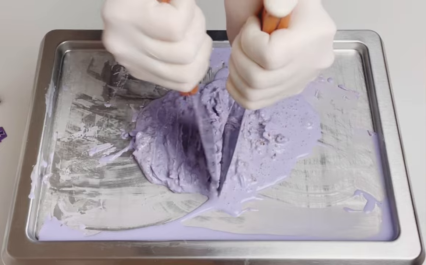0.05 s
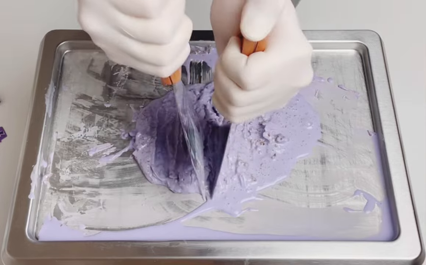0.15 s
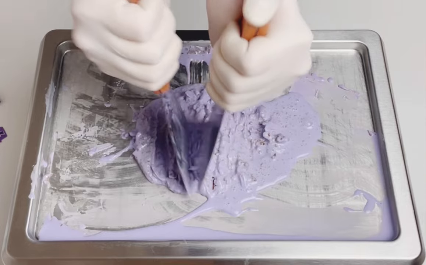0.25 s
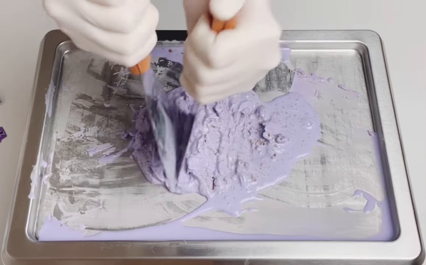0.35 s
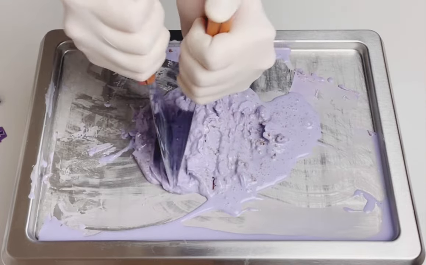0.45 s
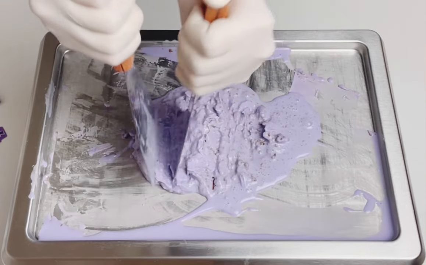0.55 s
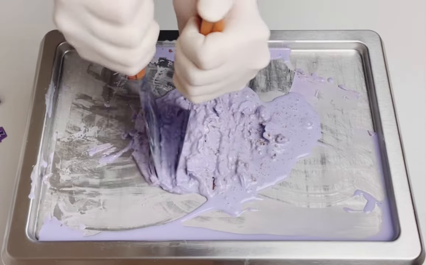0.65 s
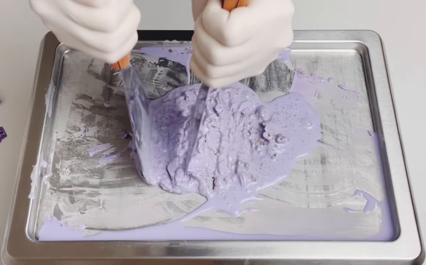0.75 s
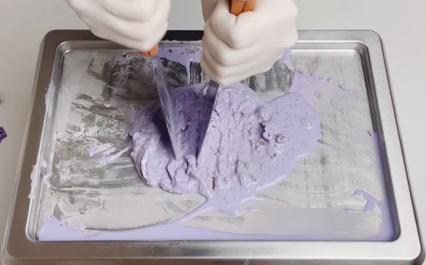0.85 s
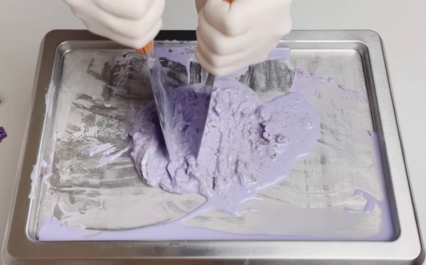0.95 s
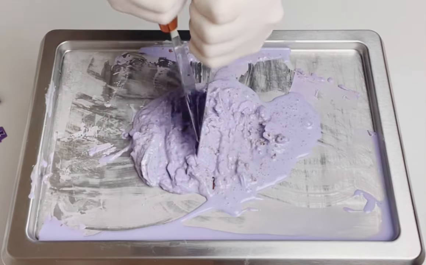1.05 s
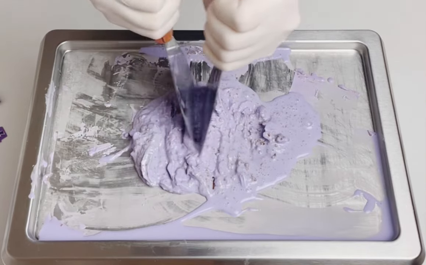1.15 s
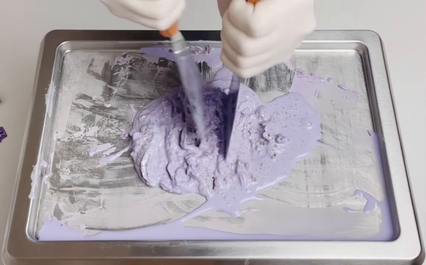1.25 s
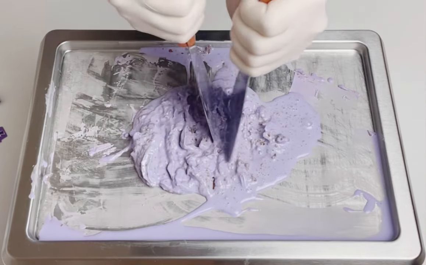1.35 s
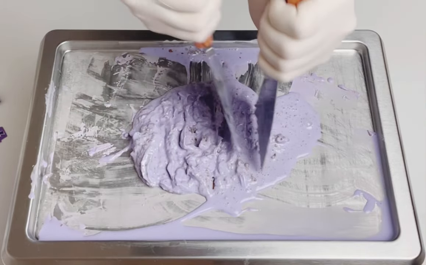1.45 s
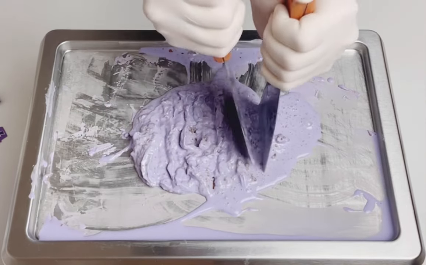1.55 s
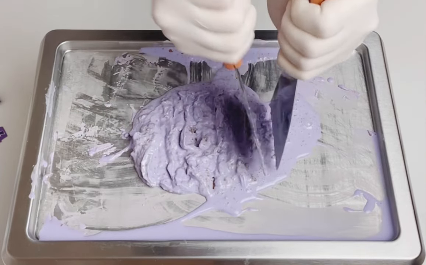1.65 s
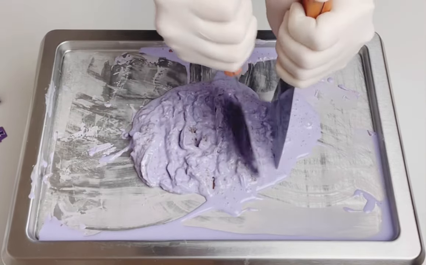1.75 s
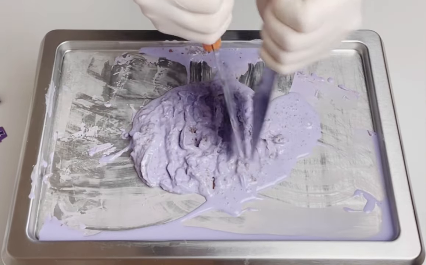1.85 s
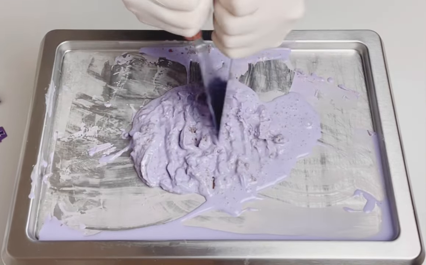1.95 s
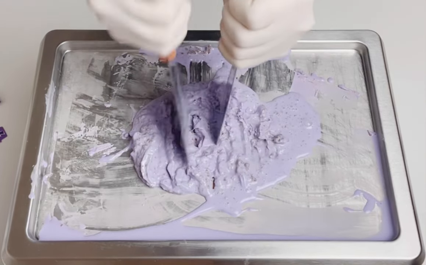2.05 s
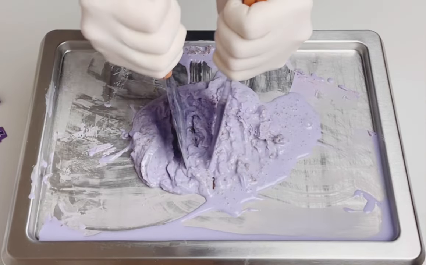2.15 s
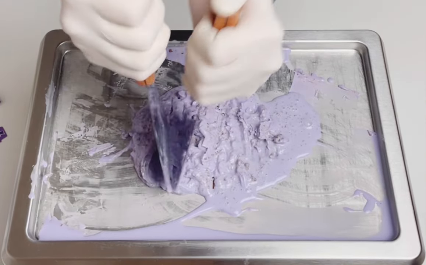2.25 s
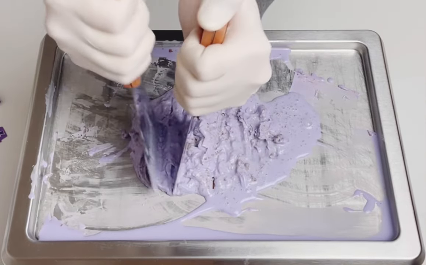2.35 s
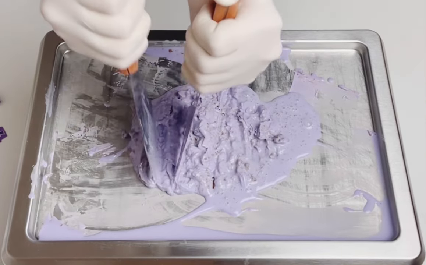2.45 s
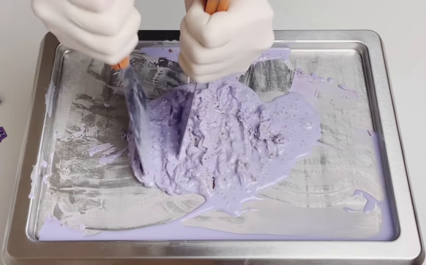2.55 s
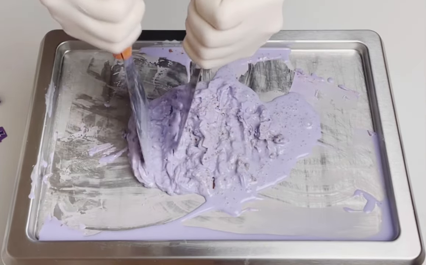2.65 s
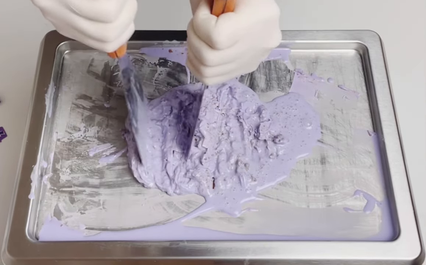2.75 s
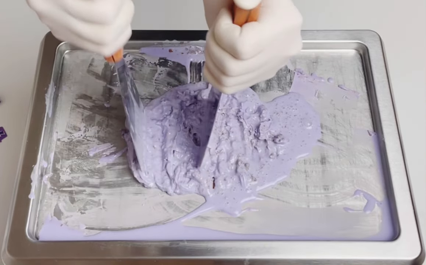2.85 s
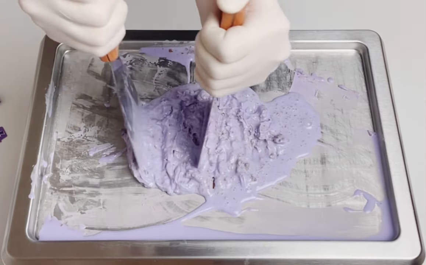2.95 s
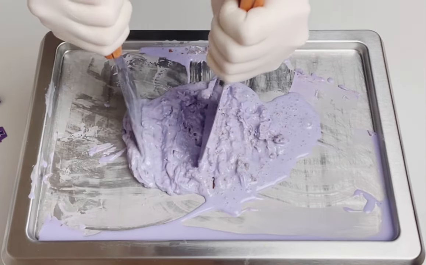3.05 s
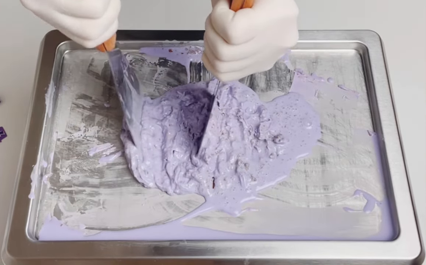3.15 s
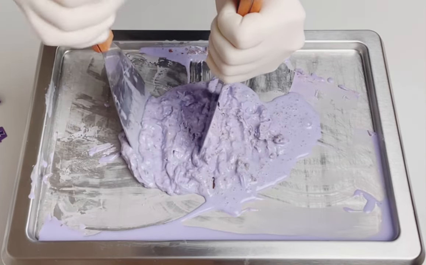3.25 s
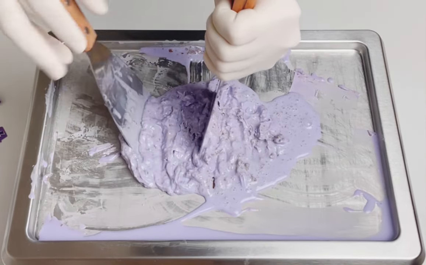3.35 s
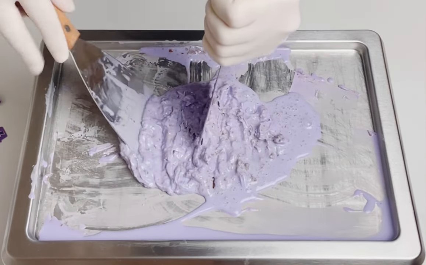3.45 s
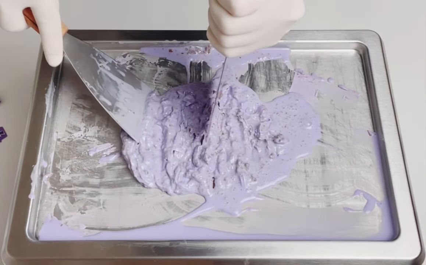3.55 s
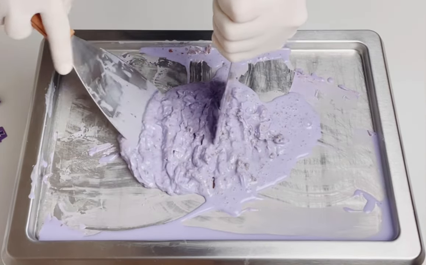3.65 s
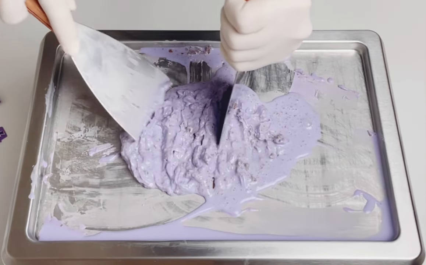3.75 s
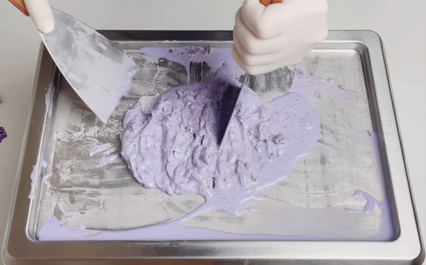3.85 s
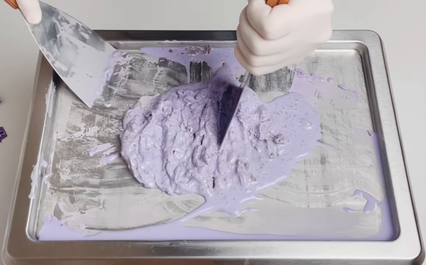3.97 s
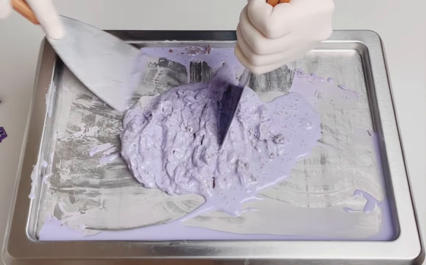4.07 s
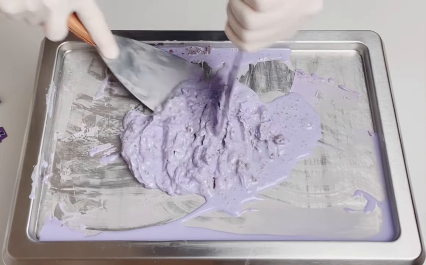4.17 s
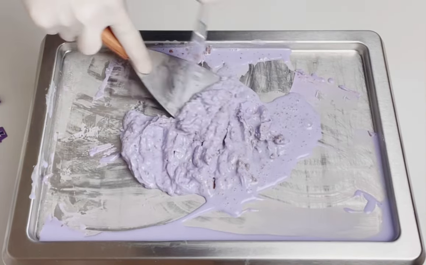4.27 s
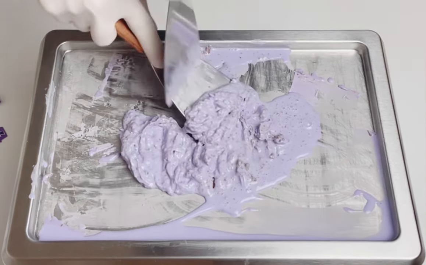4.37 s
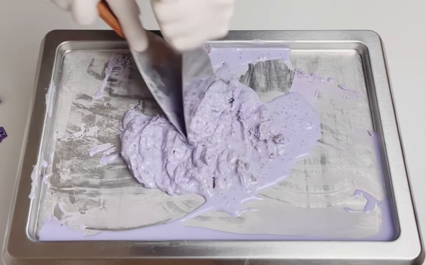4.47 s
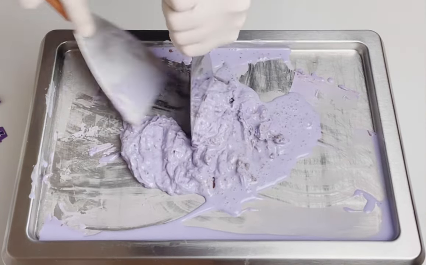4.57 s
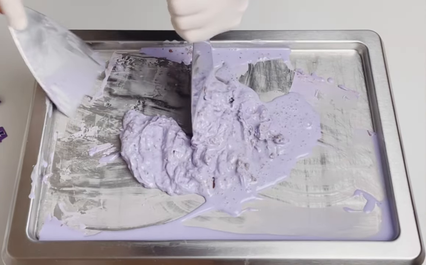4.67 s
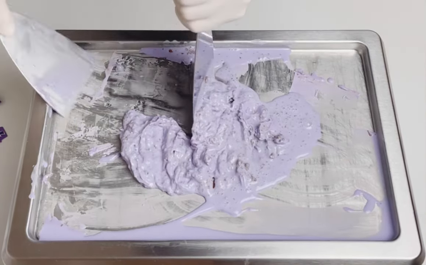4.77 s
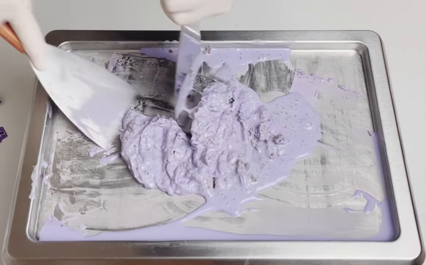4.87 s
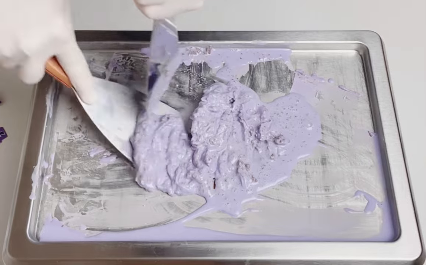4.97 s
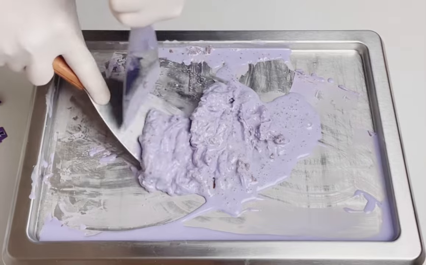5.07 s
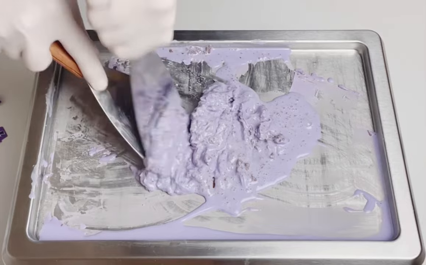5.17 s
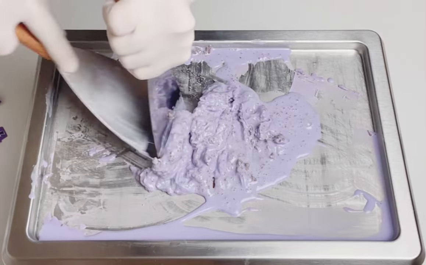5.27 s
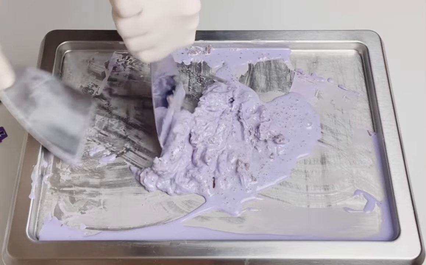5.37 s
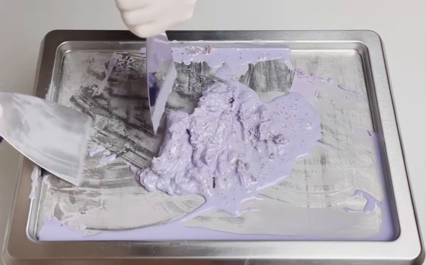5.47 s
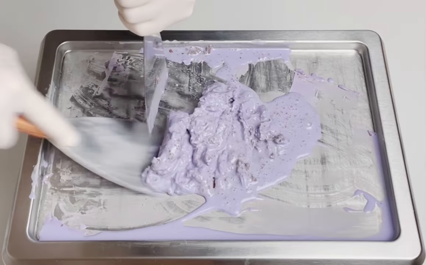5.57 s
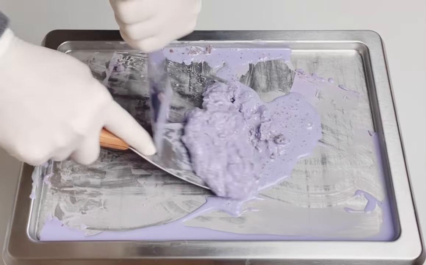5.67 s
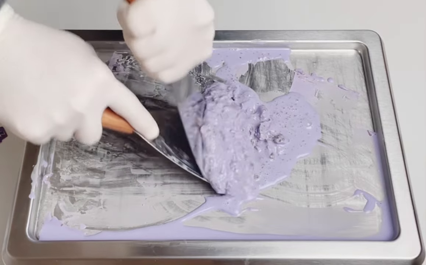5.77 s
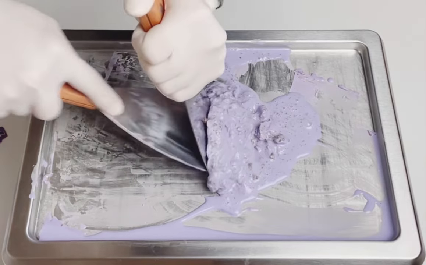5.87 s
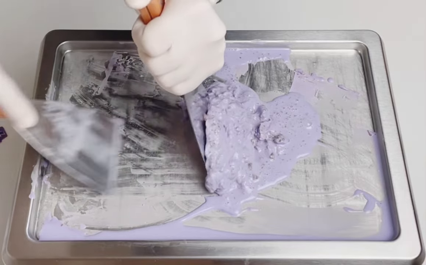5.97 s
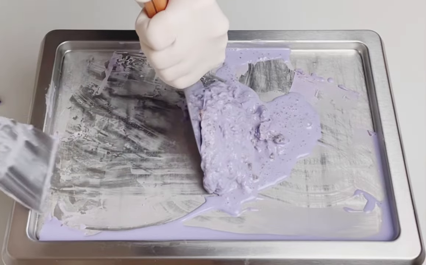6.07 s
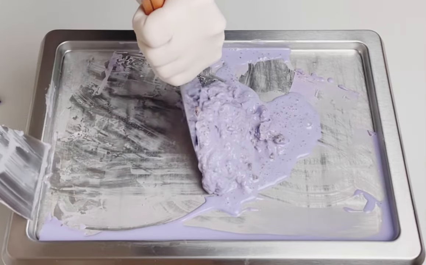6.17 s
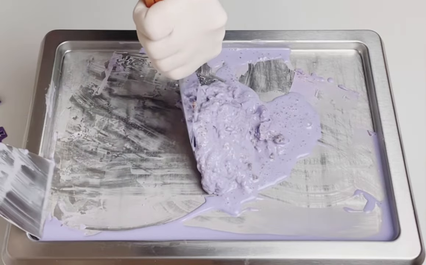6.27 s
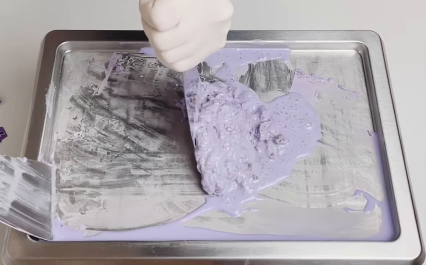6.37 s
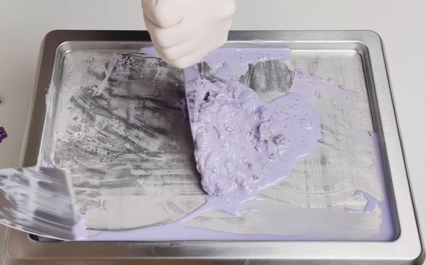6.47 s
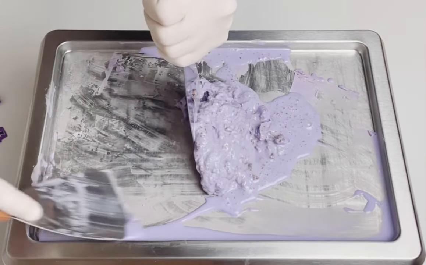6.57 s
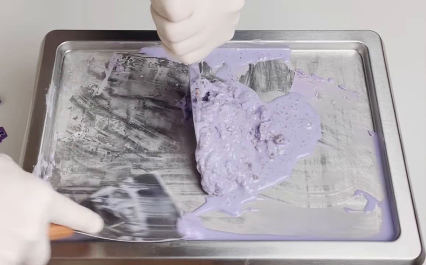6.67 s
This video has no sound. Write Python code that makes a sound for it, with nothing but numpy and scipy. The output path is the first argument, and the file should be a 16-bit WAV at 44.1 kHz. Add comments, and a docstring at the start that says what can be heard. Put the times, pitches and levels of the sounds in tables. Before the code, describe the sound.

Fast, boomy metal chopping through half-frozen cream on a steel plate, followed by icy blade scraping, squeaky rasps and sparse clacks in a small room.

```python
"""A small hard room: two steel spatulas chop half-frozen cream on a hollow steel cold plate and scrape it.
Blows strike damped plate modes and the hollow below, with noise bursts for knock and edge crack;
free blades clink as ringing modes; scraping is random ice grains driving blade resonances; short pings.
Band-wise noise reverb answers; chiller noise, tones and faint hiss lie below; two close ports pick it up."""
import sys
import numpy as np
from scipy import signal
from scipy.fft import rfft, irfft
from scipy.io import wavfile
from scipy.ndimage import uniform_filter1d

SR = 44100
rng = np.random.default_rng(int(sys.argv[2]) if len(sys.argv) > 2 else 0)


def materialize(psi):
    """Save the field psi as 16-bit PCM at rate SR to the path in sys.argv[1].

    A 1-D psi becomes a single channel; in a 2-D psi each row is a channel.
    """
    bounded = np.clip(np.atleast_2d(psi).T, -1, 1)
    quanta = np.round(bounded * 32767).astype(np.int16)
    wavfile.write(sys.argv[1], SR, quanta)


N = 296352


def amp(db):
    """Decibels to gain."""
    return 10 ** (np.asarray(db) / 20)


def rms_one(x):
    """Scale to rms 1."""
    return x / np.sqrt(np.mean(x ** 2) + 1e-20)


def at_hz(points, hz, column=1):
    """Interpolate a table on a log-frequency axis."""
    p = np.array(points, float)
    log_hz = np.log(np.maximum(hz, 1))
    return np.interp(log_hz, np.log(np.maximum(p[:, 0], 1)), p[:, column])


def drift(rate_hz):
    """Slow random wander of rms 1: low-passed noise, one value per 40 samples, interpolated."""
    step, settle = 40, 2000
    r = np.exp(-2 * step * np.pi * rate_hz / SR)
    noise = rng.standard_normal(N // step + settle + 2)
    slow = signal.lfilter([1], [1, -2 * r, r * r], noise)[settle:]
    return np.interp(np.arange(N) / step, np.arange(len(slow)), rms_one(slow))


def butter(x, order, hz, kind="low"):
    """Butterworth filter."""
    return signal.sosfilt(signal.butter(order, hz, kind, fs=SR, output="sos"), x)


def band(x, low_hz, top_hz):
    """Band-pass, steep in the bass, gentle on top."""
    return butter(butter(x, 2, low_hz, "high"), 1, top_hz)


def ring(x, hz, t60_s):
    """Two-pole mode: a unit click sets a decaying sine of height 1 ringing."""
    r = amp(-60 / (t60_s * SR))
    w = 2 * np.pi * hz / SR
    return signal.lfilter([0, np.sin(w)], [1, -2 * r * np.cos(w), r * r], x + 1e-18)


def resonate(x, hz, width_hz):
    """Resonance with gain 1 on top."""
    r = np.exp(-np.pi * width_hz / SR)
    w = 2 * np.pi * hz / SR
    return signal.lfilter([(1 - r * r) / 2, 0, (r * r - 1) / 2], [1, -2 * r * np.cos(w), r * r], x)


def sing(x, hz, width_hz):
    """Resonance with a moving centre: shift down, low-pass, shift back; rms 1."""
    turn = np.exp(2j * np.pi * np.cumsum(hz) / SR)
    r = np.exp(-np.pi * width_hz / SR)
    return rms_one((turn * signal.lfilter([1], [1, -r], x / turn)).real)


def clicks(times_s, gains):
    """One click at each time."""
    out = np.zeros(N)
    out[(np.asarray(times_s) * SR).astype(int)] = gains
    return out


def burst(times_s, level_db, t60_s):
    """White noise that starts at each contact and decays exponentially."""
    decay = amp(-60 / (t60_s * SR))
    fade = signal.lfilter([1], [1, -decay], clicks(times_s, amp(level_db)) + 1e-18)
    return fade * rng.standard_normal(N)


def crack(times_s, level_db, t60_s, low_hz, top_hz):
    """A short burst of bright noise at each contact."""
    return band(burst(times_s, level_db, t60_s), low_hz, top_hz)


def struck(times_s, level_db, modes, spread_db, late_cycles, tilt_db=0):
    """Each contact excites every mode with random strength and delay; low modes start later."""
    chance = rng.standard_normal((len(times_s), len(modes), 2))
    out = np.zeros(N)
    for k, (hz, db, t60_s) in enumerate(modes):
        late_s = late_cycles * amp(2.0 * chance[:, k, 1]) / hz
        tilt = tilt_db * np.log2(hz / 550)
        gain = amp(level_db + db + tilt + spread_db * chance[:, k, 0])
        out += (-1) ** k * ring(clicks(times_s + late_s, gain), hz, t60_s)
    return out


# left-right likeness of diffuse sound: f/Hz, correlation
LIKENESS = [(40, 1), (120, 0.92), (250, 0.95), (500, 0.3), (1000, 0.064), (2500, 0.4), (5000, 0.49),
            (9000, 1)]


def pair(mid, side, hz):
    """Left and right spectra from two unrelated ones, correlated by frequency as the room makes them."""
    alike = np.clip(at_hz(LIKENESS, hz), 0, 1)
    return np.sqrt(1 + alike) * mid + np.sqrt(1 - alike) * side * [[1], [-1]]


def air():
    """Faint treble hiss of the room, unrelated left and right."""
    return amp(-75) * band(rng.standard_normal((2, N)), 4000, 9000)


# rumble spectrum shape: f/Hz, relative density/dB
RUMBLE = [(13, -47), (22, -19), (54, -29), (96, -15), (128, -17), (163, -24), (277, -1.5), (369, -10.5),
          (448, -17.5), (598, -16.5), (708, -15.5), (839, -23.5), (969, -22.5), (1180, -29), (7000, -60.5),
          (9100, -108), (15400, -120)]
# wavering chiller tones: f/Hz, width of each of two resonances/Hz, rms level/dB
HUM_TONES = [(50, 6, -55), (135, 10, -53), (196, 10, -57), (276, 15, -51)]


def chiller():
    """Compressor and fan: shaped-noise rumble, narrow-band noise tones, one faint steady-pitched whine."""
    rumble_db, whine_hz, whine_db = -42, 782, -59
    hz = np.fft.rfftfreq(N, 1 / SR)
    white = rng.standard_normal((3, N))
    rumble = irfft(pair(rfft(white[0]), rfft(white[1]), hz) * amp(at_hz(RUMBLE, hz)), N)
    tones = np.zeros(N)
    for tone_hz, width_hz, db in HUM_TONES:
        narrow = resonate(resonate(white[2], tone_hz, width_hz), tone_hz, width_hz)
        tones += amp(db) * rms_one(narrow)
    sine = np.sqrt(2) * np.sin(2 * np.pi * whine_hz * np.arange(N) / SR)
    whine = amp(whine_db + 1.5 * drift(3)) * sine
    return amp(rumble_db) * rms_one(rumble) + tones + whine


# reverberation: f/Hz, t60/s, level/dB
REVERB = [(62.7, 0.65, 0.5), (167, 1, -2), (296, 1, -5.5), (443, 0.76, -1.5), (690, 0.52, -2.5),
          (1030, 0.49, -4), (2800, 0.47, -9), (4500, 0.43, -8), (7100, 0.37, -14), (14000, 0.28, -10.5)]


def room(x, build_s=0.0026):
    """Noise reverb: reflections thicken, then each half-octave band decays at its own rate."""
    size = SR * 3 // 4
    t = np.arange(size) / SR
    hz = np.fft.rfftfreq(size, 1 / SR)
    white = pair(*rfft(rng.standard_normal((2, size))), hz)
    growth = 1 - np.exp(-(t / build_s) ** 2)
    answer = 0
    for centre_hz in 35 * 2 ** np.arange(0, 9.1, .5):
        window = np.clip(1 - np.abs(np.log2(hz / centre_hz + 1e-9)) * 2, 0, 1)
        noise = irfft(white * window, size)
        fade = amp(-60 * t / at_hz(REVERB, centre_hz)) * growth
        level = amp(at_hz(REVERB, centre_hz, column=2))
        answer = answer + level * noise * fade / np.sqrt(np.sum(fade ** 2))
    return signal.fftconvolve(x[None], answer, axes=1)[:, :N]


def spots(count):
    """Blade positions as gates: blows are dealt to them in turn, with a short blend."""
    s = np.transpose(BLADE_BLOWS)[0]
    last = np.maximum(np.searchsorted(s - .008, np.arange(N) / SR) - 1, 0) % count
    return [uniform_filter1d(1.0 * (last == k), size=200) for k in range(count)]


# boom sent to the walls: f/Hz, level against the blow's boom/dB
WALL_BOOM = [(150, 17.5), (330, 26), (480, 37), (650, 41.5), (850, 34.5), (1050, 36.5), (1400, 24),
             (3000, -15)]
# knock sent to the walls: f/Hz, level against the blow's knock/dB
WALL_KNOCK = [(500, -0.5), (1200, 9), (1900, 19), (2500, 17.5), (3300, 10), (4500, 2), (7000, -1.5),
              (14000, -19)]
# crack sent to the walls: f/Hz, level against the blow's crack/dB
WALL_CRACK = [(2000, -7), (4000, 13), (6000, 14.5), (10000, 17), (16000, -3)]


def far_blows():
    """Each blow as one smooth-spectrum puff for the walls, where the plate modes run together."""
    s, _, boom_db, bright_db, knock_db, edge_db = np.transpose(BLADE_BLOWS)
    hz, late_s = np.fft.rfftfreq(N, 1 / SR), s + .001
    dull = rfft(clicks(late_s, amp(boom_db)))
    bright = rfft(clicks(late_s, amp(boom_db + bright_db)))
    share = np.clip(np.log2(hz / 550 + 1e-9), 0, 1)   # brightness enters over the octave from 550 Hz
    boom = ((1 - share) * dull + share * bright) * amp(at_hz(WALL_BOOM, hz))
    knock = rfft(clicks(late_s, amp(knock_db))) * amp(at_hz(WALL_KNOCK, hz))
    edge = rfft(clicks(late_s, amp(edge_db))) * amp(at_hz(WALL_CRACK, hz))
    return irfft(boom + knock + edge, N)


# narrow-band returns from near surfaces: delay/s, f/Hz, drive level against boom/dB, t60/s
NEAR_ECHOES = [(.014, 540, -39.5, 0.088), (.03, 695, -46.5, 0.054), (.045, 624, -44, 0.082),
               (.068, 580, -49, 0.11)]


def echoes():
    """Near surfaces return each boom in soft-swelling bands from alternate sides, later at the far port."""
    follows_bright = 0.94   # dB per (dB/oct) of boom tilt
    lag = int(.0004 * SR)
    s, _, boom_db, bright_db = np.transpose(BLADE_BLOWS)[:4]
    chance = rng.standard_normal((len(s), len(NEAR_ECHOES)))
    out = np.zeros((2, N))
    for k, (late_s, hz, db, t60_s) in enumerate(NEAR_ECHOES):
        level_db = boom_db + db + follows_bright * bright_db + 2.0 * chance[:, k]
        echo = ring(ring(clicks(s + late_s, amp(level_db)), hz, t60_s), hz, .03)
        out[k % 2] += echo
        out[1 - k % 2, lag:] += echo[:-lag]
    return out


# brief pings from blade or cream: t/s, drive level/dB, f/Hz, t60/s
PITCHED_PINGS = [(3.152, -51, 1030, 0.078), (3.173, -49.5, 1030, 0.019), (3.952, -43.5, 1134, 0.031),
                 (4.716, -63, 1760, 0.03), (4.728, -66, 1700, 0.03), (4.743, -69, 1680, 0.037),
                 (4.762, -72, 1660, 0.04), (4.968, -69, 3380, .03), (4.904, -63.5, 1560, 0.058),
                 (6.281, -53.5, 2890, 0.012), (6.2806, -61, 5470, 0.0083), (6.286, -74, 616, .05),
                 (6.297, -58, 617, 0.06), (6.372, -63, 2060, 0.012)]


def pings():
    """Two cascaded resonances per ping: a swell of some milliseconds, then a brief ring."""
    return sum(ring(ring(clicks([s], amp(db)), hz, t60_s), hz, .012) for s, db, hz, t60_s in PITCHED_PINGS)


# blade on blade: t/s, first blade ring/dB, second blade ring/dB, edge crack/dB
BLADE_CLINKS = [(0.029, -44, -60, -26), (0.282, -66, -66, -35), (0.32, -70, -70, -39.5),
                (0.3483, -66, -66, -40), (0.42, -64, -62, -37), (0.654, -49, -50, -40),
                (1.0402, -30.5, -68, -23), (1.0435, -37, -70, -25), (1.172, -74, -72, -38),
                (1.1894, -66, -59, -54), (1.901, -56, -66, -47), (3.5057, -56, -54, -35.5),
                (4.6535, -52, -32, -27), (4.7148, -61, -57, -24.5), (5.518, -42, -60, -29),
                (6.193, -76, -60, -51), (6.228, -57.5, -72, -55)]
# first free blade: f/Hz, level/dB, t60/s
BLADE_A = [(2105, -11, .07), (2470, -10, .08), (3290, 0, .085), (4700, -18, .05), (5860, 0, .06),
           (6640, -4, .06), (7800, -4, .06), (8700, -8, .05), (10070, -5, .04), (11100, -8, .04),
           (11750, -11, .04)]
# second free blade: f/Hz, level/dB, t60/s
BLADE_B = [(2110, -1.5, 0.08), (2810, -10, .05), (3800, -19, .05), (4270, -20, .1), (4630, -15, .05),
           (5190, -15, .05), (5930, -1, 0.041), (7260, -6, .07), (9700, -4, .05)]


def clinks():
    """The free blades ring at their own high modes, with a crack at the edge."""
    s, first_db, second_db, edge_db = np.transpose(BLADE_CLINKS)
    rings = struck(s, first_db, BLADE_A, spread_db=1.0, late_cycles=3.0)
    rings = rings + struck(s, second_db, BLADE_B, spread_db=2.0, late_cycles=3.0)
    flutter = amp(2.0 * drift(120))   # cream and grip
    return rings * flutter + crack(s, edge_db, 0.027, 1700, 7100)


# blade edge over frost; pressure bends the blade and shifts its modes:
# peak t/s, rise/s, fall/s, level/dB, tilt/(dB/oct), singing level/dB, second singing mode f/Hz
SCRAPE_STROKES = [(0.005, 0.0099, 0.096, -41, -2, 0.5, 1590), (0.3, 0.19, 0.25, -66, -6, 1, 1590),
                  (3.3, 0.48, 0.18, -69.5, 3.5, -3, 1590), (3.388, 0.016, 0.024, -58.5, -5.5, 5.5, 1590),
                  (3.55, 0.11, 0.11, -61.5, -1, 1, 1590), (4.06, 0.073, 0.085, -52, -6, 1, 1690),
                  (4.152, 0.05, 0.043, -54, 0, 8, 1680), (4.19, 0.18, 0.17, -45.5, 1, -0.5, 1674),
                  (4.484, 0.0045, 0.004, -43.5, 3, 7, 1590), (4.72, 0.085, 0.23, -56.5, -3.5, -1.5, 1670),
                  (4.85, 0.096, 0.092, -49, 2.5, -3, 1544), (4.906, 0.017, 0.064, -50, 9, -1, 1590),
                  (4.95, 0.085, 0.082, -45, 0, 2, 1590), (5.208, 0.013, 0.013, -32.5, 7.5, -6, 1590),
                  (5.42, 0.22, 0.087, -60, -8, -3, 1590), (5.561, 0.035, 0.038, -51.5, 15, 5, 1590),
                  (5.596, 0.092, 0.11, -36.5, 3, 1.5, 1590), (5.801, 0.026, 0.038, -45, 5, 0, 1590),
                  (5.834, 0.01, 0.0048, -59, -2, -10, 1590), (5.98, 0.11, 0.2, -62.5, -3.5, 1, 1590),
                  (6.19, 0.032, 0.16, -73, 13, 5, 1590), (6.297, 0.044, 0.04, -50.5, -2, -1, 1590),
                  (6.42, 0.094, 0.11, -65, -3, -8, 1590), (6.491, 0.0049, 0.1, -51, -4.5, 4, 1670),
                  (6.575, 0.12, 0.21, -40.5, 0.5, 4.5, 1665), (6.7, 0.072, 0.12, -55, 0, -2, 1560)]


def strokes():
    """Each stroke swells and fades, brightest at its peak; gives level, tilt, singing and pitch in time."""
    swell_db, swell_shape = 21, 1.22   # drop at one rise or fall time from the peak; 1 pointed, 2 round
    dulling = 0.26   # dB/oct lost per dB below the peak
    t, level, mix = np.arange(N) / SR, 1e-9, np.zeros((3, N))
    for s, rise_s, fall_s, level_db, tilt_db, sing_db, hz in SCRAPE_STROKES:
        near = slice(int(max(s - 4 * rise_s, 0) * SR), int((s + 4 * fall_s) * SR))
        away = np.where(t[near] < s, (s - t[near]) / rise_s, (t[near] - s) / fall_s)
        down_db = swell_db * away ** swell_shape
        gain = np.zeros(N)
        gain[near] = amp(level_db - down_db)
        settings = np.array(np.broadcast_arrays(tilt_db - dulling * down_db, sing_db, hz))
        mix[:, near] += gain[near] * settings
        level = level + gain
    return level, *(mix / level)   # overlapping strokes averaged by level


# broad blade resonances under friction: f/Hz, width/Hz, level at zero tilt/dB
BROAD_MODES = [(900, 520, -1.5), (1800, 1700, 6.5), (2620, 800, 4.5), (3430, 4300, 0), (4240, 1650, -2),
               (7260, 3500, 4.5), (8220, 3000, 5), (9240, 3300, 4), (12400, 4000, -34), (14600, 1800, -12)]
# narrow singing blade modes, pitch before bending: f/Hz, width/Hz, level at zero tilt/dB
SINGING_MODES = [(1070, 95, -12.5), (1590, 87, -3), (1760, 105, -7.5), (1894, 80, -8.5), (2120, 70, -6.5),
                 (2444, 100, -12.5), (2596, 65, -8.5), (3000, 80, -10.5), (3366, 57, -7.5),
                 (3690, 62, -14.5), (4260, 90, -18.5), (4800, 80, -23), (5510, 104, -8.5),
                 (5970, 140, -12.5), (6120, 140, -16.5), (6760, 120, -9)]


def scrape():
    """Dense uneven ice grains break under the edge and drive broad and singing blade resonances."""
    grains_per_s = 7000
    sizes = amp(2.4 * np.minimum(rng.exponential(1, N), 5))
    grains = sizes * rng.choice([-1, 1], N) * (rng.random(N) < grains_per_s / SR)
    grains *= amp(1.5 * drift(150))   # the edge sticks and slips
    level, tilt, sing_db, pitch_hz = strokes()
    broad, narrow = np.zeros(N), np.zeros(N)
    for k, (hz, width_hz, db) in enumerate(BROAD_MODES):
        gain = amp(db + tilt * np.log2(hz / 4000) + 1.0 * drift(12))
        broad += (-1) ** k * rms_one(resonate(grains, hz, width_hz)) * gain
    bend = pitch_hz / SINGING_MODES[1][0]
    for hz, width_hz, db in SINGING_MODES:
        moving_hz = hz * bend * (1 + .013 * drift(6))
        gain = amp(db + 0.65 * tilt * np.log2(hz / 3000) + 3.2 * drift(25))   # fits of singing
        narrow += sing(grains, moving_hz, width_hz) * gain
    return level * (broad + amp(sing_db) * narrow)


# hollow body under the plate, lowest pair beats: f/Hz, drive level/dB, t60/s
HOLLOW_MODES = [(281.1, -9, 0.42), (298.4, -5.5, 0.3), (314.3, -7, 0.16), (331.3, -6.5, 0.21),
                (353.7, -16.5, 0.43), (361.4, -24.5, 0.43)]


def hollow():
    """Air and walls under the plate ring from one push just after the touch, so the low pair beats."""
    late_s = 0.0022
    s, hollow_db = np.transpose(BLADE_BLOWS)[:2]
    push = butter(clicks(s + late_s, amp(hollow_db)) + 1e-18, 2, [200, 500], "band")
    return sum(amp(db) * ring(push, hz, t60_s) for hz, db, t60_s in HOLLOW_MODES)


# blade on plate: t/s, hollow/dB, plate boom/dB, boom tilt/(dB/oct), plate knock/dB, edge crack/dB
BLADE_BLOWS = [(0.017, -12, -11.5, -5, -6.5, -31), (0.151, -32, -21, -4.5, -7, -38),
               (0.236, -14, -16.5, -1.5, -9, -60), (0.393, -19.5, -21, 1, -8, -34),
               (0.455, -10, -11.5, 1, 2, -25), (0.602, -27, -25, -8, -17, -41),
               (0.68, -11, -10.5, 1.5, 1, -21), (0.892, -12, -13, 2.5, 1.5, -22.5),
               (1.1096, -29, -18, -10, -21, -41), (1.119, -17, -13.5, -4, -4.5, -26),
               (1.289, -21, -23.5, -18, -24, -69), (1.321, -14, -16, -1, -7.5, -26),
               (1.506, -10.5, -12, -4.5, -1, -21.5), (1.704, -10.5, -10, -2, 2, -16.5),
               (1.918, -14, -18, -3, -6, -17.5), (2.097, -16.5, -18.5, 0, -9, -39),
               (2.266, -15, -14.5, -2.5, -10.5, -56), (2.286, -16, -15.5, 2.5, -0.5, -60),
               (2.468, -11, -13, 3.5, 3, -22), (2.665, -10, -11.5, 1, 2, -27),
               (2.869, -12.5, -15.5, 3, 0.5, -34), (3.053, -17.5, -18.5, 2, -3.5, -33),
               (3.692, -26.5, -25.5, -3.5, -28.5, -71), (3.951, -34, -32, 14, 3, -5.5),
               (3.962, -36.5, -28, 2, 1, -28), (3.979, -30.5, -39, 1, -4, -40),
               (4.353, -24.5, -30, -1, -10.5, -13.5), (4.489, -16, -18, -3.5, -8, -18.5),
               (5.11, -35.5, -39.5, 2, -17, -18), (5.2134, -9.5, -10, -2.5, -0.5, -13.5),
               (5.386, -35, -35.5, 10, -9.5, -13), (5.679, -37, -32.5, -2, -17, -18.5),
               (5.768, -41, -58, -2, -36, -30), (5.779, -60, -62, 0, -24.5, -23),
               (5.838, -14.5, -16.5, -5, -10.5, -19), (6.281, -40, -42, 1, -23, -27.5)]
# plate modes damped by cream and frost: f/Hz, level/dB, t60/s
PLATE_MODES = [(417.6, -4, 0.06), (471, -5, 0.021), (485, 6.5, 0.059), (512, 5, 0.035), (597, 2, 0.032),
               (632, 3.5, 0.039), (712, -0.5, 0.04), (746.5, -2.5, 0.09), (805.4, -5.5, 0.051),
               (925, -10, 0.11), (947, 0.5, 0.025), (1030, -5, 0.07), (1168, -4, 0.034)]
# box and table under the plate: f/Hz, level/dB, t60/s
STAND_MODES = [(33.5, -36.5, 0.63), (52, -27, 0.11), (69.5, -27, 0.22), (133.64, -31, 0.57),
               (205.2, -22, 0.15)]
# dense upper plate modes in clusters: f/Hz, width/Hz, level/dB
KNOCK_CLUSTERS = [(1160, 680, -5.5), (1860, 670, -1), (2444, 733, 2), (3100, 1920, -6.5), (4050, 1200, -11)]


def blows():
    """Low plate modes boom, upper ones knock, the edge cracks, the stand thuds; also the low part alone."""
    thud_db, plunge_db = 6, -10   # against the boom
    tick_db = 4.5   # against the knock
    s, _, boom_db, bright_db, knock_db, edge_db = np.transpose(BLADE_BLOWS)
    boom = struck(s, boom_db, PLATE_MODES, spread_db=2.0, late_cycles=.45, tilt_db=bright_db)
    boom = butter(boom, 2, [230, 1600], "band")   # a small plate radiates no deep bass
    thud = butter(struck(s, boom_db + thud_db, STAND_MODES, spread_db=1.5, late_cycles=0.11), 2, 250)
    grit = burst(s, knock_db, 0.032)
    knock = np.zeros(N)
    for k, (hz, width_hz, db) in enumerate(KNOCK_CLUSTERS):
        knock += (-1) ** k * amp(db) * resonate(grit, hz, width_hz)
    # time-reversed burst: the blade cuts the cream just before it lands
    cut = burst((N - 1) / SR - s, boom_db + plunge_db, 0.044)[::-1]
    plunge = resonate(cut, 650, 590)
    # first touch of steel on steel
    tick = band(band(clicks(s, amp(knock_db + tick_db)), 2400, 5300), 1300, 5300)
    edge = crack(s, edge_db, 0.034, 5800, 6100)
    wall_lows = amp(-5.0) * boom + thud
    return boom + thud + knock + plunge + tick + edge, wall_lows


def scene():
    """Plate and blades near the ports, the room around them, the chiller below."""
    body, (hits, lows), blades, small = hollow(), blows(), clinks() + scrape(), pings()
    to_walls = amp(-8.0) * body + lows + far_blows() + blades + amp(-11.0) * small
    reverb = sum(room(to_walls * share) for share in spots(count=4))   # own reverb for each spot
    plate_side = amp(np.array([[1], [-1]]))   # left +1 dB, right -1 dB
    near = (body + hits + echoes()) * plate_side + blades + small
    return near + reverb + chiller() + air()


# phase between the ports: f/Hz, left lead/rad
PHASE_LEAD = [(0, 0), (520, 0.3), (950, -0.3), (3010, 0.8), (4220, -0.0), (4820, 0.5), (5860, -0.0),
              (6800, -1.0), (7670, -2.9), (9470, -3.8), (10400, -6.0), (12000, -6.5), (13000, -7.8),
              (13900, -9.3), (16100, -9.5)]
# level between the ports: f/Hz, left minus right/dB
BALANCE = [(60, 0), (500, 0.5), (1200, 1), (3000, 3), (7000, 2), (14000, -1.5)]


def record(dry):
    """The two ports differ in phase and level by frequency; peaks are rounded, the top is cut."""
    cutoff_hz, ceiling = 16800, .97
    hz = np.fft.rfftfreq(N, 1 / SR)
    lead_rad = np.interp(hz, *np.transpose(PHASE_LEAD))
    half = amp(at_hz(BALANCE, hz) / 2) * np.exp(.5j * lead_rad)
    ports = irfft(rfft(dry) * [half, 1 / half], N)
    rounded = ports / (1 + (ports / ceiling) ** 6) ** (1 / 6)
    return signal.sosfilt(signal.cheby2(12, 70, cutoff_hz, fs=SR, output="sos"), rounded)


dry = scene()
out = record(dry)
materialize(out)
```